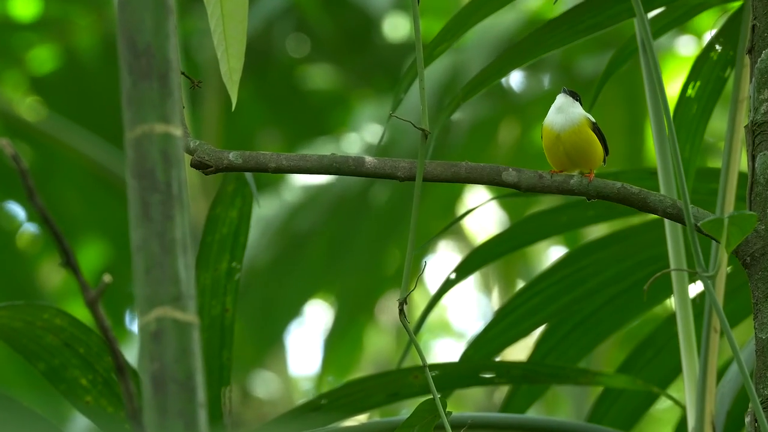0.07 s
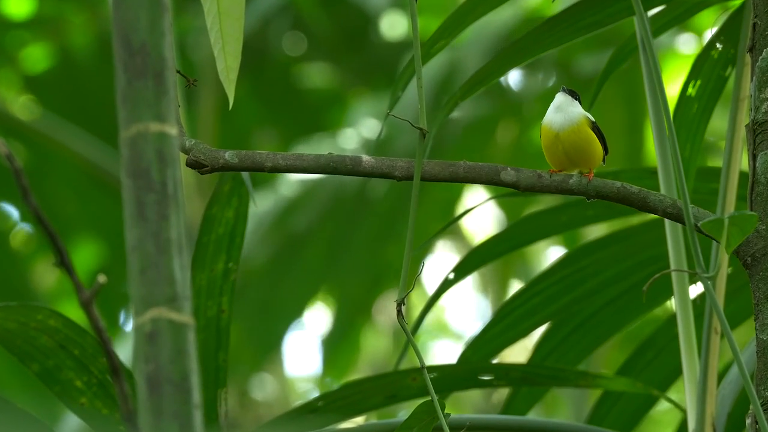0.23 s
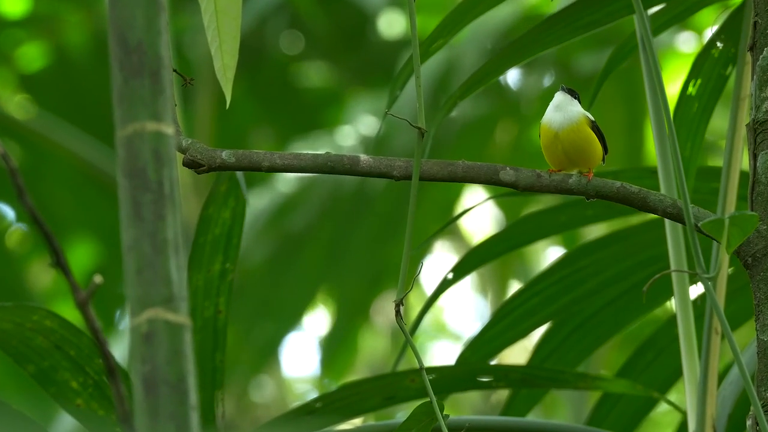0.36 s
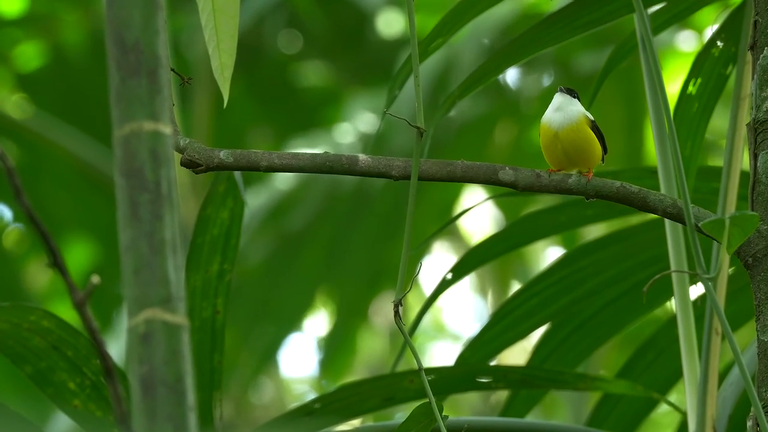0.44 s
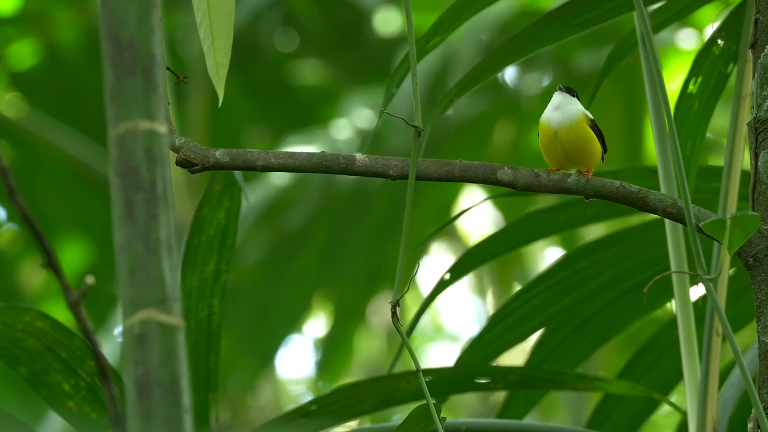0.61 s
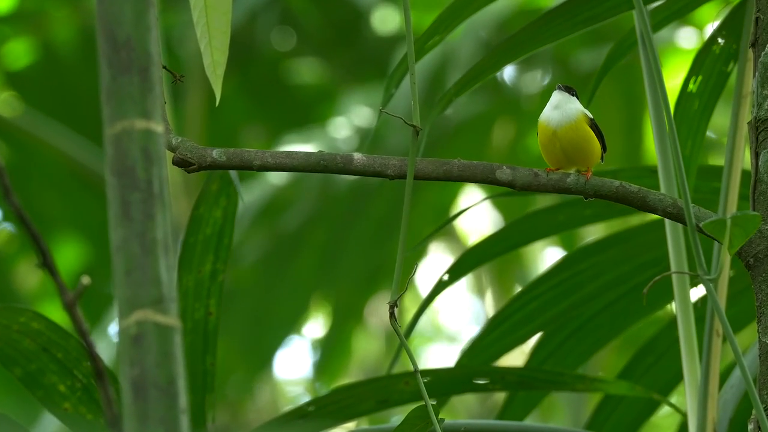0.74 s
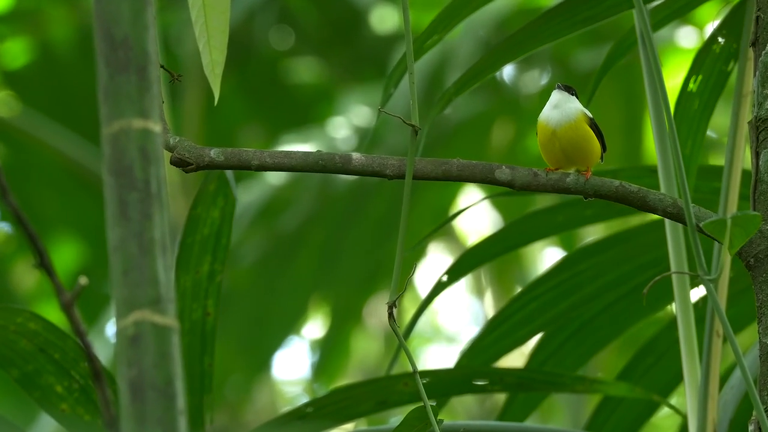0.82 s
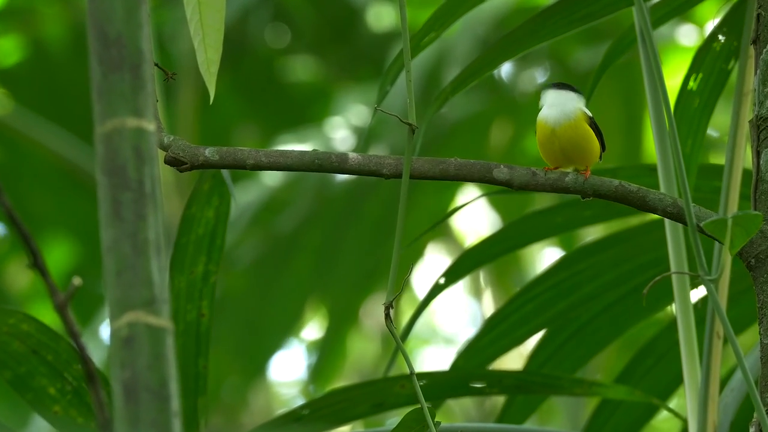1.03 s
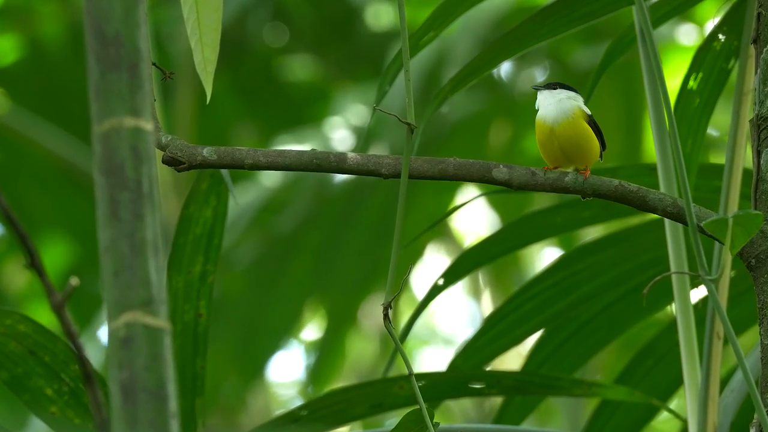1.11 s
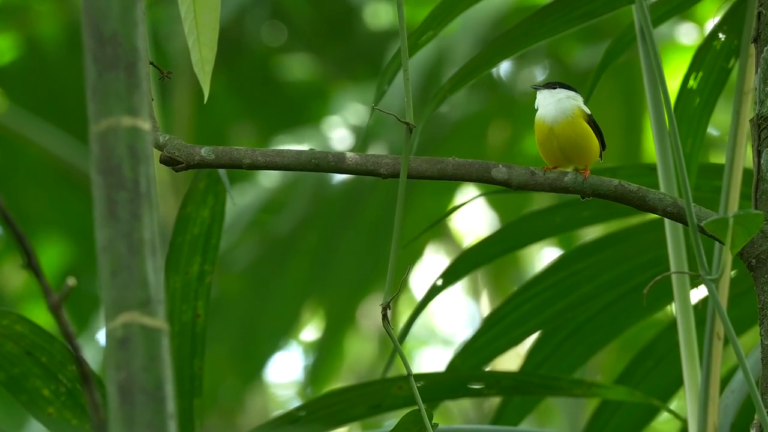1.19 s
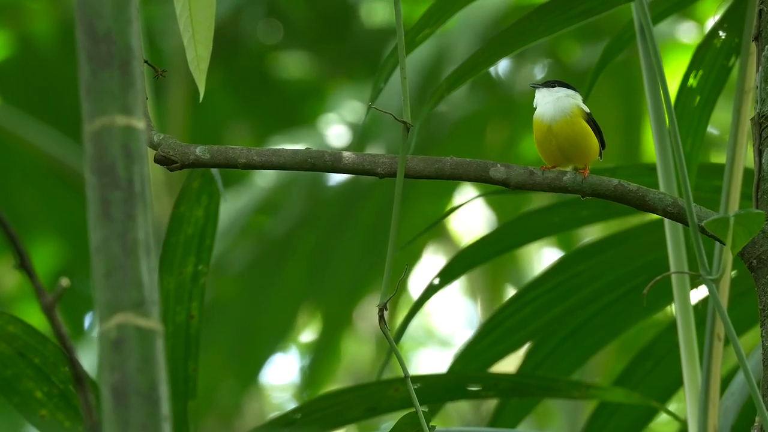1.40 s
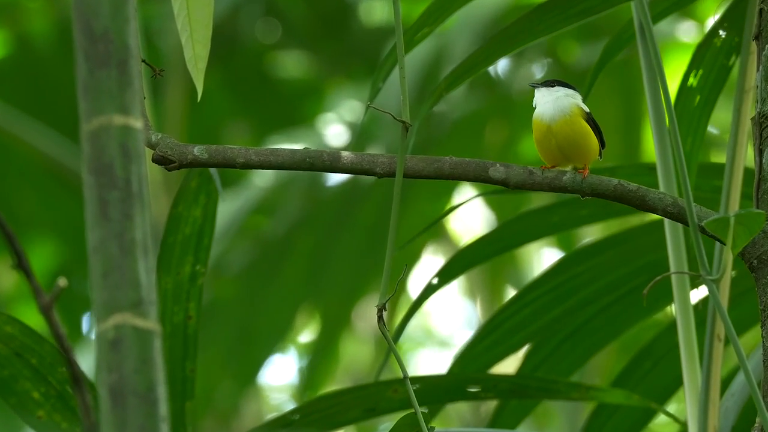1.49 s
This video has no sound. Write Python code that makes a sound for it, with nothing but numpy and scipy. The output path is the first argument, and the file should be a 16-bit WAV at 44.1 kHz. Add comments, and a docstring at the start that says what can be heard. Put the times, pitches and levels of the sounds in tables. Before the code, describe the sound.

A small bird's single sharp wing snap cracks over faint birdsong in a quiet tropical forest

```python
"""Wing snap in the undergrowth

A small bird claps its wings once in quiet tropical undergrowth: a band-limited pulse rings short resonators,
and leaves and trunks scatter it into a short bright tail of decaying noise. Other birds, gliding sines with
forest reverberation, whistle and warble further off over a blurred far chorus, leaf hiss and a low rumble,
all filtered noise."""
import sys
import numpy as np
from scipy import signal
from scipy.io import wavfile

SR = 44100
rng = np.random.default_rng(int(sys.argv[2]) if len(sys.argv) > 2 else 0)


def wav_record(signal):
    """Record a signal, one row per channel, as 16-bit PCM in the file named by sys.argv[1]."""
    frames = np.transpose(np.atleast_2d(signal))
    bounded = np.clip(frames, -1, 1)
    # unit amplitude maps onto the largest positive 16-bit level
    quanta = np.round(bounded * 32767).astype(np.int16)
    wavfile.write(sys.argv[1], SR, quanta)


N = 68355


def amp(db):
    """Logarithmic level: decibels to linear gain."""
    return 10 ** (np.asarray(db) / 20)


def rms_one(x):
    """Normalisation: scale to unit rms."""
    return x / np.sqrt(np.mean(x ** 2) + 1e-20)


def in_time(rows):
    """Linear interpolation: the columns of a table, joined in time."""
    s, *columns = np.transpose(rows)
    return [np.interp(np.arange(N) / SR, s, c) for c in columns]


def at_hz(points, hz):
    """Logarithmic frequency: a spectrum read between its points on a log axis."""
    points = np.array(points)
    return np.interp(np.log(hz), np.log(points[:, 0]), points[:, 1])


def butter(x, hz, kind, order=2):
    """Maximally flat (Butterworth) filtering."""
    return signal.sosfilt(signal.butter(order, hz, kind, fs=SR, output="sos"), x)


def drift(rate_hz):
    """Low-passed noise: a slow random curve of spread 1, made at every 40th sample and joined up."""
    r = np.exp(-80 * np.pi * rate_hz / SR)
    white = rng.standard_normal(N // 40 + 2002)
    slow = signal.lfilter([1], [1, -2 * r, r * r], white)[2000:]   # start-up dropped
    return np.interp(np.arange(N) / 40, np.arange(len(slow)), rms_one(slow))


def bands(low_hz):
    """Third-octave analysis: lower edge, upper edge and centre of each band."""
    edges = low_hz * 2 ** (np.arange(40) / 3)
    edges = edges[edges < 20000]
    return [(a, b, np.sqrt(a * b)) for a, b in zip(edges, edges[1:])]


# relative background spectrum: pitch_hz [Hz], density_db [dB per Hz]
AIR_SPECTRUM = [(20, -4.5), (60, -3), (150, -0.5), (250, -8.5), (400, -14), (700, -19.5), (1100, -20.5),
                (2000, -25), (4000, -23.5), (7000, -32), (9500, -34.5), (11800, -37), (15500, -39.5)]
# treble changes over time: time_s [s], treble_db [dB], top_db [dB]
TREBLE_LEVELS = [(0, 7.5, 4), (.4, 5.5, 1), (.7, 2, -4), (.86, 1, -20), (1.55, -5, -47)]
# correlation of the two sides: pitch_hz [Hz], likeness [-1 to 1]
SIDE_LIKENESS = [(60, 0.99), (130, 0.98), (290, 0.99), (640, 0.74), (1410, 0.37), (3100, 0.035),
                 (6820, 0.28), (15000, 0.16)]
AIR_DB = -64   # overall rms
TREBLE_HZ, TOP_HZ = 5200, 12000   # full treble change from here; the top follows its own curve
PATCHY_DB = 1.4   # random spread of each band's level


def air():
    """Interaural correlation: rumble and leaf hiss as band noise, alike on both sides in the bass."""
    out = 0
    white = rng.standard_normal((2, 2, N + SR // 2))
    treble_db, top_db = in_time(TREBLE_LEVELS)
    for k, (low, high, hz) in enumerate(bands(TOP_HZ / 512)):
        # neighbouring bands use different noise; the filter's start-up is dropped
        mid, side = butter(white[k % 2], [low, high], "band")[:, -N:]
        alike = np.clip(at_hz(SIDE_LIKENESS, hz), -1, 1)
        change_db = top_db if hz > TOP_HZ else treble_db * min(hz / TREBLE_HZ, 1)
        db = at_hz(AIR_SPECTRUM, hz) + change_db + PATCHY_DB * drift(9.7)
        stereo = np.sqrt(1 + alike) * mid + np.sqrt(1 - alike) * side * [[1], [-1]]
        out = out + amp(db) * stereo
    return amp(AIR_DB) * rms_one(out)


# far chorus over time, before CHORUS_TRIM_DB: time_s [s], level_db [dB]
CHORUS_LEVELS = [(0.0, -57.5), (0.288, -62), (0.512, -64.5), (0.708, -66), (0.932, -75.5), (1.092, -77),
                 (1.282, -77), (1.55, -87)]
# pitch ranges of the far voices: pitch_hz [Hz], width_hz [Hz], relative level_db [dB]
CHORUS_VOICES = [(3236, 380, -2.5), (3590, 160, -2.5), (4050, 140, -8.5), (4530, 410, -1), (5090, 520, -3)]
CHORUS_TRIM_DB, CHORUS_FLICKER_DB, CHORUS_FLICKER_HZ = -3.0, 4.3, 6.5


def chorus():
    """Incoherent superposition: far voices smeared into a few flickering bands, unlike on each side."""
    out = 0
    for hz, width_hz, db in CHORUS_VOICES:
        edges = [hz - width_hz / 2, hz + width_hz / 2]
        voice = rms_one(butter(rng.standard_normal((2, N)), edges, "band", order=3))
        out = out + amp(db + CHORUS_FLICKER_DB * drift(CHORUS_FLICKER_HZ)) * voice
    return amp(in_time(CHORUS_LEVELS)[0] + CHORUS_TRIM_DB) * rms_one(out)


FADE_S, WAVER = 0.0049, .007   # fade at each end; relative random spread of pitch
LAG_S_PER_DB = .000015   # a bird to the right also arrives there first


def tone(rows, pan_db, flutter_db, far_db):
    """Phase integration: a wavering, fluttering sine along rows of (s, Hz, dB); left, right, forest send."""
    t = np.arange(N) / SR
    hz, db = in_time(rows)
    gate = np.clip(np.minimum(t - rows[0][0], rows[-1][0] - t) / FADE_S, 0, 1)
    turns = np.cumsum(hz * (1 + WAVER * drift(30))) / SR + rng.random()
    size = np.sqrt(2) * gate * amp(db + flutter_db * drift(84))
    paths = [(pan_db / 2, pan_db * LAG_S_PER_DB), (-pan_db / 2, 0), (far_db, 0)]
    return np.array([size * amp(gain_db) * np.sin(2 * np.pi * (turns + hz * lead_s))
                     for gain_db, lead_s in paths])


# long falling whistle: time_s [s], pitch_hz [Hz], level_db [dB]
SLIDE_PATH = [(0, 3164, -63), (.016, 3130, -66), (0.051, 2985, -63), (0.057, 3100, -67.5),
              (0.09, 2920, -66), (.103, 2680, -62.5), (0.158, 2352, -64), (0.189, 2130, -73),
              (0.215, 2050, -68.5)]
SLIDE_ENDS_S, SLIDE_FLUTTER_DB, SLIDE_BLUR_DB = .235, -3.4, -5


def slide():
    """Frequency glide: a long falling whistle, already sounding at the start."""
    before = (-1, *SLIDE_PATH[0][1:])
    after = (SLIDE_ENDS_S, *SLIDE_PATH[-1][1:])
    return tone([before, *SLIDE_PATH, after], -1.1, SLIDE_FLUTTER_DB, SLIDE_BLUR_DB)


# gliding notes: start_s [s], length_s [s], from_hz [Hz], to_hz [Hz], starting level_db [dB],
# left_minus_right_db [dB]
GLIDING_NOTES = [(0.022, 0.019, 5100, 5060, -65, -22), (0.023, 0.11, 3580, 3590, -92, -16),
                 (0.096, 0.039, 4970, 3910, -68, -23), (0.151, .04, 4750, 4160, -57, -23.5),
                 (0.156, 0.019, 5500, 5540, -69, 0), (.275, 0.038, 3250, 3376, -74, -9),
                 (0.298, 0.023, 3050, 3250, -79, -39), (0.35, 0.026, 3720, 3753, -68, -18),
                 (.36, 0.021, 5100, 5060, -68, -20), (0.389, 0.049, 4650, 4020, -60.5, -22),
                 (0.433, 0.03, 4600, 4300, -73, -6), (0.438, 0.095, 3780, 3825, -61.5, -4.5),
                 (0.537, 0.041, 3700, 3810, -64, -6), (0.546, 0.049, 3280, 3114, -59, -8),
                 (0.519, 0.03, 3260, 3220, -66.5, -10), (.62, 0.053, 4560, 4076, -60.5, -11.5),
                 (0.708, 0.019, 5400, 5200, -80, 3.5), (0.844, 0.019, 2950, 2940, -71, -8),
                 (0.863, 0.15, 3620, 3567, -82.5, -13.5), (0.868, 0.086, 7300, 7210, -94, 4),
                 (0.911, .14, 6176, 6330, -80.5, 5), (0.954, .07, 6500, 6500, -86, 6),
                 (0.982, 0.028, 4750, 4310, -75.5, -6.5), (1.012, 0.025, 3750, 3370, -72, -4),
                 (1.003, .1, 4700, 4770, -85, 2.5), (1.072, .11, 2905, 2960, -86, -6),
                 (1.25, 0.033, 4530, 4400, -73, -0.5), (1.262, .03, 4160, 3240, -75, 4.5),
                 (1.25, 0.074, 6400, 6450, -97, -15), (1.281, 0.1, 3720, 3843, -76, -11),
                 (1.301, 0.018, 1870, 1810, -81, 2.5), (1.389, 0.12, 3850, 3632, -75.5, 1),
                 (1.499, 0.11, 3200, 3010, -76, -4)]
FLUTTER_DB, NOTE_SAG_DB = 2.5, 7   # notes weaken toward their end
STEADY_DB, FLUTTER_PER_DB = -60, .2   # notes fainter than this flutter more
NEAR_DB, BLUR_PER_DB = -52.5, 0.1831   # fainter birds are further off, so more blurred


def notes():
    """Distance cue: short gliding whistles, with more flutter and reverberation when fainter."""
    out = 0
    for start_s, length_s, from_hz, to_hz, db, pan_db in GLIDING_NOTES:
        rows = [(start_s, from_hz, db), (start_s + length_s, to_hz, db - NOTE_SAG_DB)]
        flutter_db = FLUTTER_DB + FLUTTER_PER_DB * max(STEADY_DB - db, 0)
        out = out + tone(rows, pan_db, flutter_db, BLUR_PER_DB * (NEAR_DB - db))
    return out


# shape of one warble: time_after_start_s [s], pitch_hz [Hz], relative level_db [dB]
WARBLE_SHAPE = [(0, 4800, -5), (.006, 4200, -5.5), (.011, 3720, -10.5), (0.015, 4594, -5),
                (.023, 4560, -12), (.029, 4225, 0), (0.035, 3380, -14), (0.042, 2900, -18)]
# each warble: start_s [s], level_db [dB], left_minus_right_db [dB]
WARBLE_CALLS = [(0.124, -52, -15), (0.352, -54.5, -20.5), (0.574, -58.5, -25)]
WARBLE_BLUR_DB = 11


def warbles():
    """Frequency modulation: one rapid pitch contour, repeated at several levels."""
    out = 0
    for start_s, level_db, pan_db in WARBLE_CALLS:
        rows = [(start_s + s, hz, level_db + db) for s, hz, db in WARBLE_SHAPE]
        out = out + tone(rows, pan_db, FLUTTER_DB / 2, WARBLE_BLUR_DB)
    return out


BIRD_WET_DB, BIRD_T60_S = -3, 0.67
EARLY_DB, EARLY_T60_S = 7.5, .06   # first cluster of reflections


def birds():
    """Convolution reverberation: all whistles, direct and blurred differently on each side."""
    voices = slide() + notes() + warbles()
    t = np.arange(SR // 2) / SR
    decay = amp(-60 * t / BIRD_T60_S) + amp(EARLY_DB - 60 * t / EARLY_T60_S)
    blur = rng.standard_normal((2, len(t))) * decay
    blur = blur / np.linalg.norm(blur, axis=1, keepdims=True)
    return voices[:2] + amp(BIRD_WET_DB) * signal.fftconvolve(voices[2:], blur, axes=1)[:, :N]


# wing resonances: pitch_hz [Hz], drive level_db [dB], t60_s [s]
WING_RINGS = [(3030, -4, 0.0034), (4050, -23, 0.018), (4630, -24, 0.0067), (1854, -17, 0.0062)]
SNAP_S, SNAP_DB = .22462, -19.5   # the level is the clap's peak
SNAP_LOW_HZ, SNAP_HIGH_HZ = 2106, 5340   # edges of the clap
PUFF_DB, PUFF_HZ = -18.5, 650   # air pushed out
ECHO_S, ECHO_DB = .0047, -18   # one near reflection


def snap():
    """Impulse excitation: a band-limited clap rings the wings briefly, with a puff and one echo."""
    click = np.sinc(np.arange(N) - SNAP_S * SR)
    clap = butter(butter(click, SNAP_LOW_HZ, "high", order=5), SNAP_HIGH_HZ, "low", order=4)
    clap = clap / abs(clap).max()
    puff = butter(click, [200, PUFF_HZ], "band") * SR / PUFF_HZ / 6
    out = clap + amp(PUFF_DB) * puff
    for hz, db, t60_s in WING_RINGS:
        r, w = amp(-60 / (t60_s * SR)), 2 * np.pi * hz / SR   # pole radius and angle
        ring = signal.lfilter([.3, 0, -.3], [1, -2 * r * np.cos(w), r * r], clap)
        out = out + amp(db) * ring
    echo = np.roll(clap, int(ECHO_S * SR))
    return amp(SNAP_DB) * (out + amp(ECHO_DB) * echo)


# relative spectrum of the scattered tail: pitch_hz [Hz], density_db [dB per Hz]
TAIL_SPECTRUM = [(710, -54), (1200, -31), (2740, -5.5), (3010, -3.5), (3810, 0.5), (5910, -0.5),
                 (6110, 3.5), (9570, -20.5), (10400, -23), (15500, -36)]
# decay of the tail: pitch_hz [Hz], t60_s [s]
TAIL_DECAY = [(1500, 0.18), (3000, 0.19), (5000, 0.19), (8000, 0.14), (13000, .2)]
TAIL_DB, TAIL_RISE_S = -28, 0.00041
LATE_DB, LATE_SLOWER = -9.5, 2.14   # the slow part: relative level, decay time ratio


def tail():
    """Diffuse scattering: countless leaf echoes as noise dying band by band, with a weaker slow part."""
    t = np.maximum(np.arange(N) / SR - SNAP_S, 0)
    rise = 1 - np.exp(-t / TAIL_RISE_S)
    out, white = 0, rng.standard_normal((2, N))
    for k, (low, high, hz) in enumerate(bands(1000)):
        fall_db = -60 * t / at_hz(TAIL_DECAY, hz)
        late_db = LATE_DB + fall_db / LATE_SLOWER
        shape = np.sqrt(amp(2 * fall_db) + amp(2 * late_db))   # the two parts add in power
        echoes = butter(white[k % 2] * shape * rise, [low, high], "band")
        out = out + amp(at_hz(TAIL_SPECTRUM, hz)) * echoes
    return amp(TAIL_DB) * out


# soft low rustles: centre_s [s], length_s [s], pitch_hz [Hz], peak level_db [dB]
SOFT_RUSTLES = [(0.382, 0.04, 890, -71.5), (0.454, 0.098, 1090, -71.5), (0.598, 0.041, 1210, -74)]


def rustles():
    """Amplitude envelopes: brief Gaussian swells of dull band noise."""
    t, out = np.arange(N) / SR, 0
    for centre_s, length_s, hz, db in SOFT_RUSTLES:
        swell = np.exp(-2 * ((t - centre_s) / length_s * 2) ** 2)
        noise = rms_one(butter(rng.standard_normal(N), [hz / 1.33, hz * 1.36], "band"))
        out = out + amp(db) * swell * noise
    return out


def scene():
    """Linear superposition: snap, tail and rustles in the middle, the rest around them."""
    return air() + chorus() + birds() + snap() + tail() + rustles()


CUTOFF_HZ = 16300   # 60 dB down from here up


def record(dry):
    """Band limitation: a steep low-pass cuts the top."""
    return signal.sosfilt(signal.cheby2(12, 60, CUTOFF_HZ, fs=SR, output="sos"), dry)


dry = scene()
out = record(dry)
wav_record(out)
```